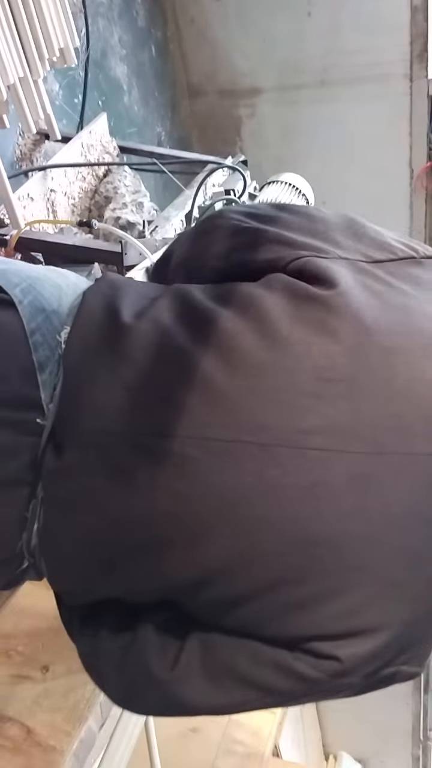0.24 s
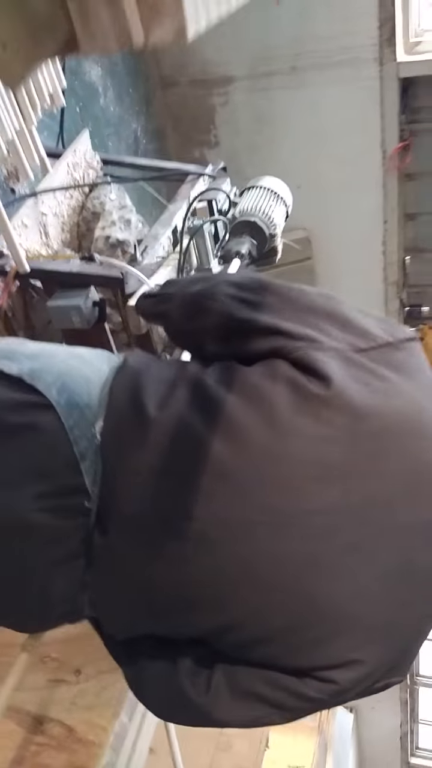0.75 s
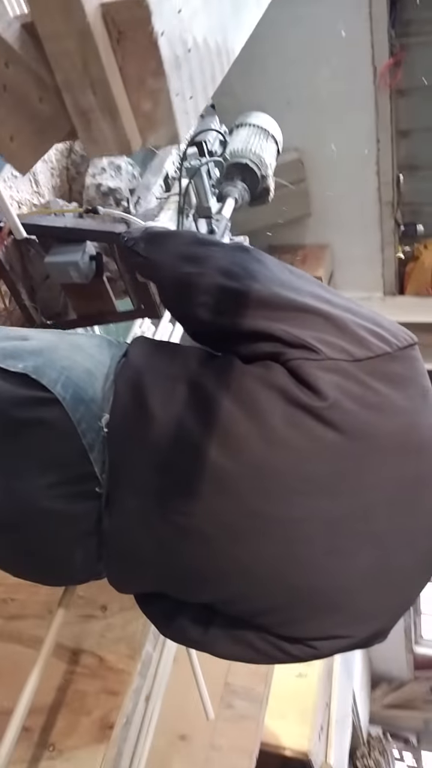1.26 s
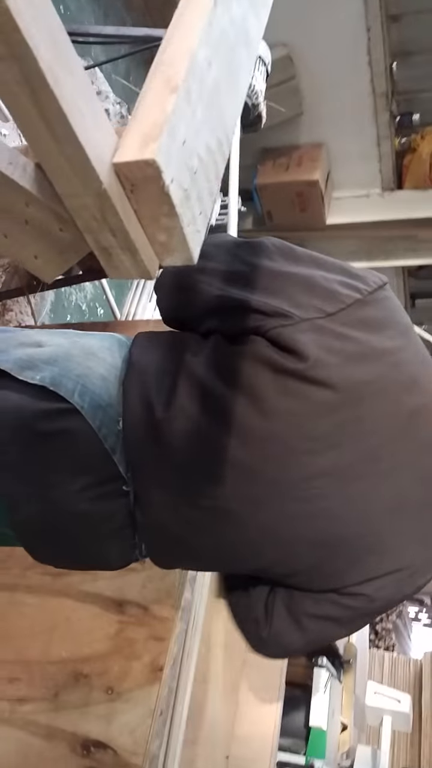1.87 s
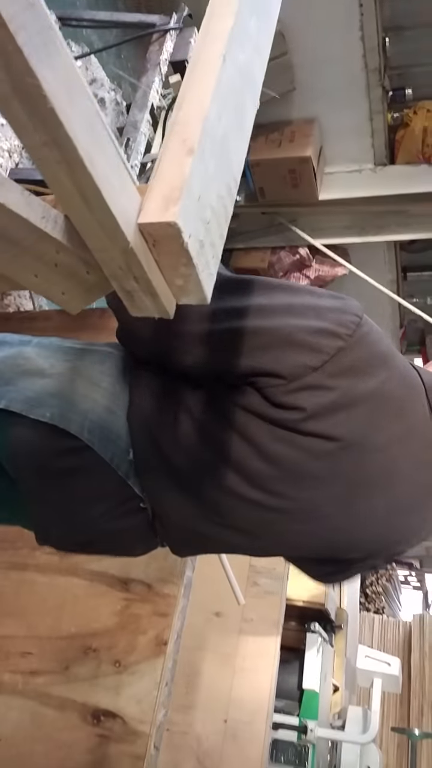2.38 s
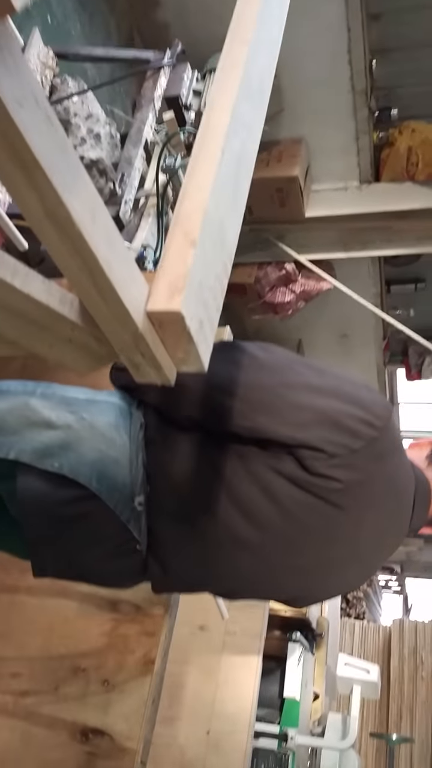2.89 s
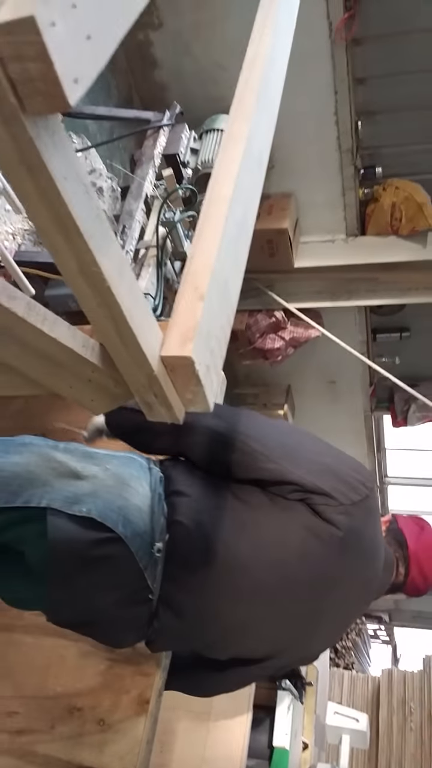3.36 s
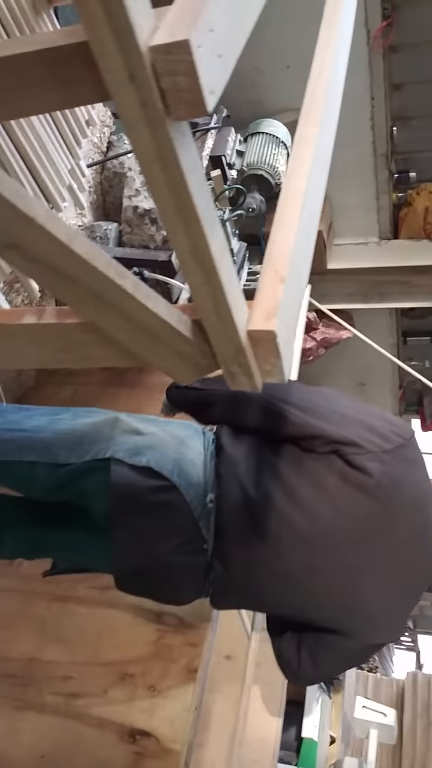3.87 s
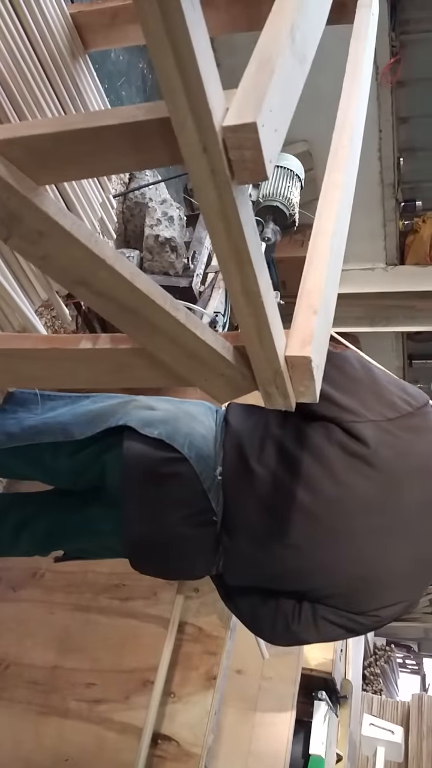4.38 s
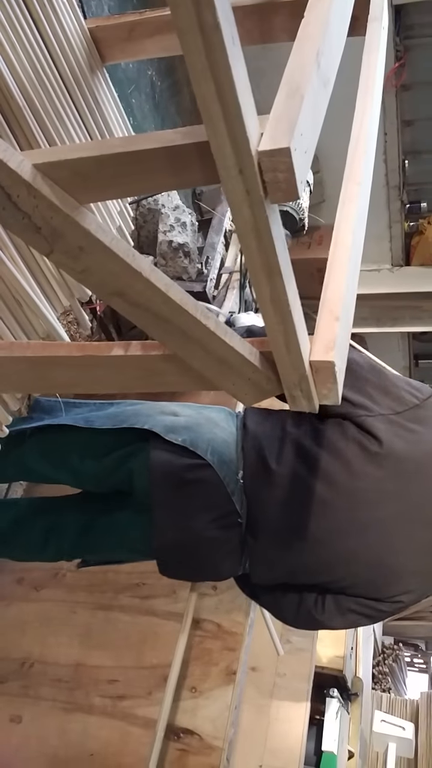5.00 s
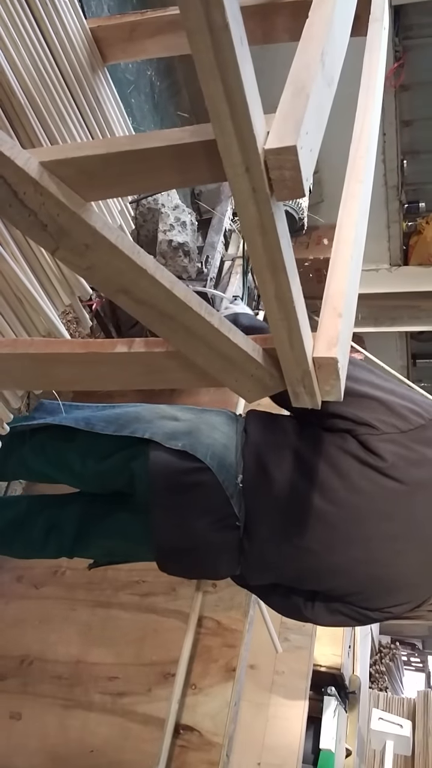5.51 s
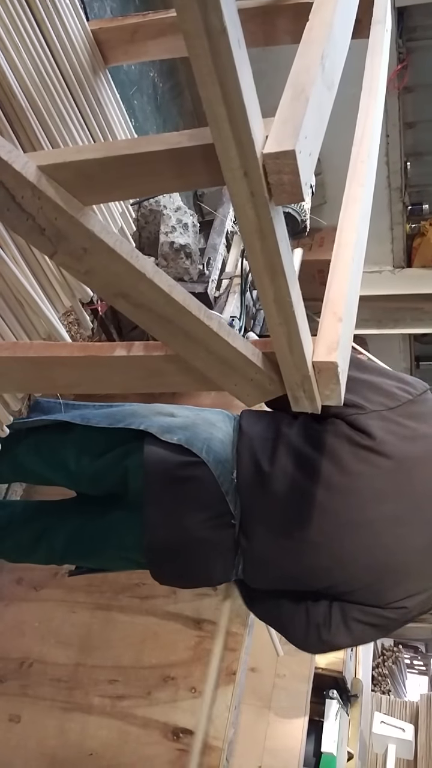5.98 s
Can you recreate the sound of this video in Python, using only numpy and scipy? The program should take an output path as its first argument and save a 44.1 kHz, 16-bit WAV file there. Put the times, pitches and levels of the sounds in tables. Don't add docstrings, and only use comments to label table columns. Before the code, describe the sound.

Continuous woodworking machine din, heard by someone walking past with a hand-held microphone: a mid-pitched, whirring chord from two spinning cutters and a hissing rush that changes colour with each step. An early soft puff and tick, then a hard burst of air and a quick run of bright ticks, a stick dropping with a short woody clatter, and later more brief puffs. Little deep bass; sharp peaks briefly duck the noise.

```python
import sys
import numpy as np
from scipy import signal
from scipy.fft import rfft, irfft
from scipy.io import wavfile
from scipy.ndimage import uniform_filter1d, map_coordinates

SR = 44100
rng = np.random.default_rng(int(sys.argv[2]) if len(sys.argv) > 2 else 0)


def wav_record(signal):
    frames = np.transpose(np.atleast_2d(signal))
    bounded = np.clip(frames, -1, 1)
    quanta = np.round(bounded * 32767).astype(np.int16)
    wavfile.write(sys.argv[1], SR, quanta)


def nominal_scale(level):
    x = np.asarray(level, float) / 20
    return 10 ** x


N = 275625
T = np.arange(N) / SR

KNIVES = 6
FRAMES, POINTS = 320, 2048
START_TURNS, GAIN_TURNS = (93.8, 95.27), (0.035, 0.023)

# (f/Hz, level/dB per Hz)
LEFT_RUSH = [(200, -64.5), (330, -64.5), (550, -67.5), (900, -68), (1400, -61.5), (1800, -59),
             (2600, -56.5), (3700, -62.5), (4600, -59), (7200, -56), (9000, -65.5), (11500, -69.5),
             (14000, -68.5), (15700, -72)]
RIGHT_RUSH = [(200, -61.5), (330, -61.5), (550, -61), (900, -63.5), (1400, -59.5), (1800, -55.5),
              (2600, -56), (3700, -59.5), (4600, -63), (7200, -66.5), (9000, -75), (11500, -72),
              (14000, -74.5), (15700, -64.5)]
# (f/Hz, likeness 0-1)
LIKENESS = [(200, 0.97), (550, 0.82), (900, 0.3), (1500, 0.59), (2600, 0.22), (3700, 0.13), (5000, 0),
            (9000, 0.44), (15000, 0)]
# (f/Hz, lead/rad)
LEFT_LEAD = [(0, 0), (430, 0.4), (1640, 4.0), (2500, 6.2), (2930, 6.5), (3620, 9.5), (4220, 9.8),
             (4570, 11.4), (7060, 17.9), (8010, 18.6), (11600, 27.6), (13700, 31.9), (15600, 37.5),
             (16500, 37.4)]
# (f/Hz, width/Hz, level/dB)
RUSH_HOLLOWS = [(3775, 210, -1.5), (4340, 150, -2.5), (3140, 140, -1.5)]
# (t/s, nearness/dB, open view to the chips/dB, turn to the left/dB)
WALK = [(0, 6, -7, -2), (.3, 5, -8.5, 1.5), (.7, -1, -2, -0.5), (1.1, -2.5, 4.5, 3), (1.5, -4, 10, -2),
        (1.9, -3.5, 10.5, -4), (2.3, -0.5, 0, -1.5), (2.7, -2, 5, -0.5), (3.0, 1, -0.5, 0.5),
        (3.3, -3, 7, 0), (3.6, -0.5, 4, -1.5), (4.1, -1.5, 7, -1), (4.6, -0.5, 5.5, -1), (5.1, 2, -2.5, 0),
        (5.5, 2, -0.5, -0.5), (5.9, 1.5, -2, 2.5), (6.25, 2, 1, -0.5)]
# (t/s, speed to near head/(m/s), speed to far head/(m/s))
APPROACH = [(0, 0, .3), (.45, .36, -.3), (.9, 0, .07), (1.25, 0, .05), (1.55, -.5, .15), (2.0, .55, .05),
            (2.5, .36, .15), (2.95, -.55, .25), (3.35, -.07, -.25), (3.75, .1, .2), (4.3, -.35, .1),
            (4.55, .1, -.35), (5.2, .1, .2), (5.55, .5, .3), (5.8, .1, .1), (6.25, .2, -.05)]
# (t/s, level/dB)
BODY_SCREEN = [(0, -6), (.4, -1), (.9, 0), (1.5, 0.5), (2.3, -1), (3.0, 0), (3.6, 1), (4.4, -1.5),
               (4.9, -5), (5.4, -3.5), (5.9, 0), (6.25, 0)]

# (start t/s, end t/s, f/Hz, width/Hz, level/dB, lean/dB)
WHISTLES = [
    (3.85, 4.7, 801, 3.7, -44, -2),
    (3.37, 3.66, 4880, 740, -24, 5),
    (1.26, 1.6, 4700, 930, -34, 9),
    (1.5, 1.68, 7500, 640, -29, 12),
    (1.6, 7, 7340, 430, -34.5, 12),
]
# (t/s, length/s, level/dB, lean/dB)
PUFFS = [
    (0.518, 0.035, -18.5, -2),
    (1.689, 0.013, -10, 3),
    (4.762, 0.008, -18, 3),
    (4.782, 0.012, -16.5, -1),
    (5.957, 0.014, -17, 1),
]
# (f/Hz, level/dB per Hz)
JET = [(3000, -24), (5000, -11), (8500, -7), (11000, -1), (14000, 0), (16000, -1)]
# (t/s, peak level/dB, f/Hz, 60 dB decay/s, lean/dB)
TICKS = [(0.11, -11, 2890, 0.046, -3), (0.643, -6, 2740, 0.018, -3), (1.471, -10, 4500, .012, 3),
         (2.908, -16, 2430, .03, -4), (2.912, -13, 3300, 0.027, 0), (1.792, -4, 7030, .008, 6),
         (1.834, -9, 7000, .008, -1), (1.951, -15, 6500, .008, 9), (1.961, -6, 6950, 0.0088, 6),
         (1.993, -4, 7600, 0.0097, 2), (2.037, -12, 4580, 0.018, -2), (2.916, -5.5, 2310, 0.022, -8),
         (2.918, -6, 3180, 0.02, 3), (2.917, -14, 4560, .012, 0), (2.916, -6.5, 5600, 0.026, -1),
         (2.948, -9, 3550, 0.025, 0), (3.802, -6, 2800, 0.009, 0), (5.098, -14, 6850, 0.01, 7)]
# (t/s, peak level/dB)
THUDS = [
    (2.954, -9),
    (2.964, -19),
    (2.9755, -12),
    (3.006, -17),
    (3.03, -22),
]
# (f/Hz, level/dB, twice the 60 dB decay/s)
PILE_TONES = [(140, 1, 0.3), (183, 6, 0.18), (255, 3, 0.14), (330, -6, 0.2), (440, -2, 0.08),
              (650, -6, 0.09), (820, -4, .08)]

# (order, level/dB above 1 Hz of rush)
NEAR_ORDERS = [(2, -10), (3, 14), (4, 14), (5, 8), (7, -3), (9, 22), (11, 22), (15, 18.5), (17, 23.5),
               (21, 19.5), (22, 20), (27, 15), (28, 17)]
FAR_ORDERS = [(2, 4.4), (3, 2.8), (5, 18.8), (8, 9.3), (10, 24), (11, 22), (13, 19.3), (15, 25), (16, 13),
              (21, 3.5), (22, 3.7), (25, 3.3), (26, 5.6), (27, 12.5), (28, 2.6), (29, 3.3)]
# (order, t/s, length/s, right
# level/dB, lean/dB)
NEAR_SPOTS = [(6, 0.25, 0.7, -29.5, -7.5), (6, 0.71, 1.4, -31.5, -5), (6, 2.495, 0.51, -24, -17),
              (6, 2.94, 0.43, -24, -8), (6, 3.22, 1.1, -31.5, -3), (6, 4.25, 0.31, -32.5, -12),
              (6, 6.1, 2.4, -32, -23), (12, 0.13, 0.92, -23, -8), (12, 1.26, 0.48, -27.5, -20),
              (12, 1.81, 0.23, -28.5, -26), (12, 2.44, 2.2, -35, 8), (12, 4.43, 0.71, -27.5, -25),
              (12, 5.06, 0.72, -24.5, -23), (12, 5.66, 0.78, -21.5, -15), (12, 6.16, 0.25, -24, -26),
              (18, 0.34, 0.19, -22.5, 1.5), (18, 0.74, 0.3, -19.5, -4.5), (18, 1.16, 0.4, -18, -11),
              (18, 1.93, 0.42, -28, -17), (18, 2.48, 0.26, -23, -15), (18, 3.86, 0.54, -20, -5.5),
              (18, 5.9, 0.27, -22.5, -15), (18, 6.36, 2.9, -20.5, -17), (18, 9, 0.15, -20.5, -10),
              (24, 0.81, 0.14, -30, -25), (24, 1.115, 0.2, -22, -21), (24, 1.37, 0.12, -24, -2),
              (24, 1.57, 0.17, -31, -6), (24, 4, 0.21, -31, -6), (24, 5.19, 0.19, -33, -12),
              (30, 0.37, 0.26, -27.5, -8), (30, 1.38, 0.39, -29, -14), (30, 1.93, 0.22, -31, -27),
              (30, 2.87, 0.27, -24.5, -14), (30, 4.01, 0.12, -30.5, -8), (30, 4.9, 0.51, -32, -3.5),
              (30, 5.57, 0.41, -30.5, -25), (30, 6.17, 0.15, -32, -2),
              (10, 0.87, 0.16, -42, 0), (10, 1.5, 0.57, -38, -25), (10, 4.63, 0.17, -38, 4),
                   (10, 5.4, 1.3, -42.5, 8), (13, 2, 0.91, -38, -5), (13, 3.22, 0.34, -41, -1),
                   (13, 5.3, 3.1, -31.5, -7), (14, 0.33, 0.24, -35, 1), (14, 0.81, 0.36, -32, 1.5),
                   (14, 2.15, 1.3, -32.5, -9), (14, 3.22, 0.26, -30.5, -12), (14, 5.08, 0.5, -33, -17),
                   (16, 0.58, 0.34, -31.5, -7), (16, 2.4, 0.19, -33, -9), (16, 5.8, 7, -31.5, -4),
                   (19, 0.39, 0.28, -43, -3), (19, 1.12, 0.2, -26, -14), (19, 2.55, 0.26, -31, 2),
                   (19, 3.9, 0.52, -33, -12), (20, 0.39, 0.27, -41.5, 10.5), (20, 0.69, 0.34, -28.5, -6),
                   (20, 1.13, 0.48, -30.5, 1.5), (20, 3.96, 0.17, -29, -2), (20, 4.3, 0.36, -32, -8),
                   (23, 1.2, 0.84, -29.5, -14), (23, 3.2, 0.22, -32, -18), (23, 3.1, 2.5, -30, -10),
                   (26, 0.85, 0.96, -34, -2), (26, 2.49, 0.34, -35.5, 1), (26, 3.4, 0.27, -32, -4),
                   (26, 3.74, 0.22, -45, -6), (29, 0.39, 0.28, -30, -2), (29, 1.19, 0.27, -44, -3),
                   (29, 2.3, 0.15, -33, -10), (36, 1.15, 0.36, -28.5, -17), (36, 2.8, 0.17, -36, -4),
                   (36, 3.49, 0.15, -27.5, -10), (25, .2, .5, -31.5, -7),
              (8, 0.3, 0.99, -33.5, -6), (8, 2.56, 0.7, -42, -4)]
FAR_SPOTS = [(6, 0.08, 0.16, -36, -19), (6, 0.45, 0.53, -42, -25.0), (6, 2.9, 0.16, -40, -12.0),
             (6, 6, 0.28, -37, -20), (12, 0.41, 0.39, -28.5, 0), (12, 1.27, 0.36, -29, -25.0),
             (12, 2.2, 0.72, -27, -12), (12, 3.02, 0.48, -25, -22.0), (12, 3.46, 0.32, -26.5, -25.0),
             (12, 5.5, 3.4, -26, -5), (12, 4.52, 0.13, -25, -8), (12, 6.7, 0.42, -30.0, -3),
             (18, 1.37, 0.29, -25, -7), (18, 1, 0.36, -44, -17.0), (18, 3.28, 0.31, -27.5, -15),
             (18, 3, 0.2, -29, -10), (18, 3.8, 0.94, -24, -15), (18, 5.77, 0.32, -26, 2),
             (18, 5, 0.44, -32, -4.0), (18, 5.3, 0.28, -26, -1), (18, 4.6, 0.3, -27, -8),
             (18, 6.2, 0.25, -25, -4.0), (24, 0.11, 0.28, -26.5, -7), (24, 0.46, 0.15, -33, -9.0),
             (24, 1.5, 0.18, -33, -9.0), (24, 2.03, 0.41, -37.5, 3.5), (24, 5.7, 0.59, -39, -6),
             (24, 7.5, 0.2, -38, -5), (30, 0.01, 0.21, -29.0, -2), (30, 0.37, 0.15, -32, -4),
             (30, 5.8, 0.32, -42.0, 3.0), (14, 1.17, 0.15, -41.0, -12.0), (14, 1, 1.05, -47, -16.0),
             (14, 3.9, 0.18, -42.0, -25.0), (20, 0.54, 0.15, -40, -5), (20, 0.91, 0.34, -33.0, -6.0),
             (20, 1.3, 0.29, -33, -8.0), (20, 4.31, 0.66, -42, -9.0),
             (17, 0.33, 0.15, -35, 1), (17, 1.45, 0.28, -39, 1), (17, 2.76, 0.64, -30, -11),
                  (17, 4, 0.55, -29.5, -16), (17, 4.75, 0.24, -36, -8), (17, 5.24, 0.58, -28.5, -15),
                  (19, 2.7, 1.59, -32, -25), (19, 3.7, 0.33, -29, -24), (19, 4.45, 0.53, -29, -1),
                  (19, 4.97, 0.23, -33, -13), (19, 5.8, 0.57, -33, -2), (23, 1.08, 0.25, -37, -25),
                  (23, 2.4, 2.1, -38, -19), (23, 2.22, 0.26, -31, -8), (23, 3.05, 0.16, -37, -4),
                  (23, 3.36, 0.15, -38, 0),
             (4, 5.4, 3.7, -44.5, -5.5), (7, 1.3, 2.3, -46, -4), (9, 1.3, 1.8, -44, -9)]
# (order, right level/dB, lean/dB)
NEAR_REST = [(6, -37.5, -15), (12, -55, 4), (18, -46, -4), (24, -36, -4), (30, -37.5, -3.5),
             (10, -44, -1), (13, -55, 13), (14, -35, -30), (16, -36, -7), (19, -42.5, -2),
                  (20, -38.5, -3), (23, -46, -2), (26, -44.5, 6), (29, -42, -3), (36, -38, 2),
                  (25, -43.5, -3),
             (8, -53.5, 1)]
FAR_REST = [(6, -42, -5.5), (12, -38.5, -25), (18, -33, -0.5), (24, -43.5, 0), (30, -53, -8), (14, -49, 6),
            (20, -46, -6),
            (17, -45, -2), (19, -53, 1), (23, -47, -1),
            (4, -59, -6), (7, -53, 2), (9, -58, -4)]

# (t/s, dip level/dB, onset/s, recovery/s)
DIPS = [
    (.518, -4.5, 0.049, 0.042),
    (1.689, -9, 0.015, 0.073),
    (1.92, -3, 0.0069, 0.047),
    (1.994, -4.5, .005, 0.034),
    (2.919, -3.5, .005, 0.033),
    (2.957, -2.5, 0.0041, 0.054),
    (4.775, -0.5, 0.018, 0.034),
    (5.958, -4.5, 0.014, 0.063),
]
# (f/Hz, extra sink/dB for each dB below the surroundings)
SUPPRESS = [(900, 0), (1400, 3), (2200, 2), (3000, 4.5), (4300, 8), (5200, 2.5), (7500, 1.5), (9500, 8),
            (15000, 8)]
# (f/Hz, level/dB)
BASS_CUT = [(20, -50), (60, -46), (100, -40), (130, -24), (150, -16.5), (176, -12.5), (190, 0)]


def in_time(rows, s):
    rows = np.array(rows)
    return np.array([np.interp(s, rows[:, 0], column) for column in rows.T[1:]])


def at_hz(points, hz):
    points = np.array(points)
    return np.interp(np.log(hz + 1), np.log(points[:, 0] + 1), points[:, 1])


def lean(db):
    return nominal_scale(db * np.array([[0.5], [-0.5]]))


def drift(rate):
    knots = rng.standard_normal(400)
    return map_coordinates(knots, [T * np.clip(rate, 0.1, 60)], order=1) * 1.22


def port_pair(hz, shape):
    shared, left, right = rng.standard_normal((3, *shape, 2)) @ [1, 1j] / np.sqrt(2)
    alike = np.clip(at_hz(LIKENESS, hz), 0, 1)
    lead = np.exp(1j * np.interp(hz, *np.transpose(LEFT_LEAD)))
    leads = np.array([lead, np.ones_like(lead)]).reshape(2, *[1] * (len(shape) - 1), -1)
    return np.sqrt(alike) * shared * leads + np.sqrt(1 - alike) * np.array([left, right])


def turns(which):
    t = T + np.cumsum(in_time(APPROACH, T)[which]) / SR / 343
    return START_TURNS[which] * t + GAIN_TURNS[which] * t ** 2 / 2


def rush(hump_db, patchy_db, knife_beat, turn_beat):
    view_hz, screen_hz = 6340, 2130
    low_turn, bass_share = 1, 0.046
    shade_db = 2
    hz = np.fft.rfftfreq(N, 1 / SR)
    angle = turns(0)
    knife_hz = KNIVES * angle[-1] * SR / N
    humps_db = hump_db * np.cos(2 * np.pi * hz / knife_hz)
    for at, width_hz, db in RUSH_HOLLOWS:
        humps_db = humps_db + db * np.exp(-((hz - at) / width_hz) ** 2)
    colour = nominal_scale(np.array([at_hz(LEFT_RUSH, hz), at_hz(RIGHT_RUSH, hz)]) + humps_db)
    noise = colour * port_pair(hz, hz.shape) * np.sqrt(N * SR / 2)
    turn_pulse = np.cos(2 * np.pi * angle) + np.cos(4 * np.pi * angle)
    beat = knife_beat * np.cos(2 * np.pi * KNIVES * angle) + turn_beat * turn_pulse

    near_db, view_db, turn_db = in_time(WALK, T)
    screen_db = in_time(BODY_SCREEN, T)[0]
    together = drift(14)
    centres = np.geomspace(225, 14400, 13)
    place = np.interp(np.log(hz + 1), np.log(centres), np.arange(13))
    out = 0
    for k, centre in enumerate(centres):
        treble = np.clip(np.log2(centre / 1500) / 2, 0, 1)
        near_share = bass_share + (1 - bass_share) * np.clip(np.log2(centre / 300) / 2, 0, 1)
        db = near_db * near_share
        db = db + view_db / (1 + (view_hz / centre) ** 2)
        db = db + screen_db * np.exp(-2 * np.log2(centre / screen_hz) ** 2)
        db = db + shade_db * drift(3.025)
        db = db + patchy_db * treble * (0.18 * together + drift(20))
        lean_db = (low_turn + (1 - low_turn) * treble) * turn_db
        band = irfft(noise * np.clip(1 - abs(place - k), 0, 1), N)
        out = out + band * nominal_scale(db) * lean(lean_db) * (1 + treble * beat)
    return out


def whistles():
    out = np.zeros((2, N))
    for start, end, hz, width_hz, db, lean_db in WHISTLES:
        edges = [hz - width_hz / 2, hz + width_hz / 2]
        narrow = signal.butter(2, edges, "band", fs=SR, output="sos")
        band = signal.sosfilt(narrow, rng.standard_normal((2, N)))
        gate = np.clip(np.minimum(T - start, end - T) / 0.11, 0, 1)
        out += band / band.std() * gate * nominal_scale(db) * lean(lean_db)
    return out


def valves():
    hz = np.fft.rfftfreq(N, 1 / SR)
    jet = irfft(nominal_scale(at_hz(JET, hz)) * port_pair(hz, hz.shape), N)
    gate = np.zeros((2, N))
    for s, length, db, lean_db in PUFFS:
        rise = np.clip((T - s) / 0.0027, 0, 1)
        fall = np.exp(-np.maximum(T - s - length, 0) / 0.021)
        gate += rise * fall * nominal_scale(db) * lean(lean_db)
    return jet / jet.std() * gate


def ring(s, db, hz, t60):
    t = np.maximum(T - s, 0)
    return nominal_scale(db - 3 - 60 * t / t60) * np.minimum(20 * t / t60, 1) * np.sin(2 * np.pi * hz * t)


def stick_ticks():
    rough = 1 + 0.7 * uniform_filter1d(rng.standard_normal((2, N)), size=5)
    out = np.zeros((2, N))
    for s, db, hz, t60, lean_db in TICKS:
        out += ring(s, db, hz, t60) * rough * lean(lean_db)
    return out


def stick_lands():
    low_band = signal.butter(4, [130, 850], "band", fs=SR, output="sos")
    rumble = signal.sosfilt(low_band, rng.standard_normal(N))
    out = np.zeros(N)
    for s, db in THUDS:
        for hz, tone_db, t60 in PILE_TONES:
            out += ring(s, db + tone_db - 7 + rng.normal(0, 2.0), hz, t60 / 2)
        out += ring(s, db + 6, 320, 0.033) + ring(s, db, 620, 0.022)
        out += rumble * (T > s) * nominal_scale(db + 1 - 60 * np.maximum(T - s, 0) / 0.15)
    return out * nominal_scale(np.array([[-3.5], [2.5]]))


def standing(spots, rest):
    s = np.linspace(0, N / SR, FRAMES)
    power = {k: nominal_scale([[db + lean_db], [db]]) ** 2 + 0 * s for k, db, lean_db in rest}
    for k, middle, length, db, lean_db in spots:
        bell = np.exp(-(2 * (s - middle) / length) ** 2)
        power[k] = power[k] + nominal_scale([[db + lean_db], [db]]) ** 2 * bell
    return power


def head(which, spots, rest, low_orders, turn_db, knife_db, fade_db, width_hz):
    order = np.arange(1, 170)
    angle = turns(which)
    hz = order * angle[-1] * SR / N
    over_db = np.where(order % KNIVES == 0, knife_db - fade_db * np.log2(order / 36), turn_db)
    for k, db in low_orders:
        over_db[k - 1] = db
    size = nominal_scale(over_db + np.array([at_hz(LEFT_RUSH, hz), at_hz(RIGHT_RUSH, hz)]))[:, None]

    sway = port_pair(hz, (FRAMES, len(order)))
    keep = np.exp(-np.pi * width_hz * np.sqrt(order / 18) * N / SR / FRAMES)
    for i in range(1, FRAMES):
        sway[:, i] = keep * sway[:, i - 1] + np.sqrt(1 - keep ** 2) * sway[:, i]
    lead = np.interp(hz, *np.transpose(LEFT_LEAD)) * np.array([[1], [0]])
    steady = np.exp(1j * (rng.uniform(0, 2 * np.pi, len(order)) + lead))
    lines = size * (0.5 * steady[:, None] + 0.65 * sway)
    for k, power in standing(spots, rest).items():
        lines[:, :, k - 1] = np.sqrt(power) * (steady[:, None, k - 1] + 0.25 * sway[:, :, k - 1])

    with_zero_order = np.pad(lines, ((0, 0), (0, 0), (1, 0)))
    waves = irfft(with_zero_order, POINTS) * POINTS / np.sqrt(2)
    where = [T * SR / N * (FRAMES - 1), angle % 1 * POINTS]
    return np.array([map_coordinates(w, where, order=1, mode="grid-wrap") for w in waves])


def near_head():
    spots = NEAR_SPOTS
    rest = NEAR_REST
    return head(0, spots, rest, NEAR_ORDERS + [(78, 7.2)],
                turn_db=16.0, knife_db=25.0, fade_db=2.5, width_hz=1.97)


def far_head():
    spots = FAR_SPOTS
    rest = FAR_REST
    return head(1, spots, rest, FAR_ORDERS, turn_db=11.5, knife_db=17.0, fade_db=23.0, width_hz=1.35)


def scene():
    air = rush(hump_db=-1.0, patchy_db=1.15, knife_beat=0.055, turn_beat=0.064)
    events = whistles() + valves() + stick_ticks() + stick_lands()
    return air + events + far_head() + near_head()


def limit(x):
    gain_db = 0
    for s, db, onset, recovery in DIPS:
        fall = np.clip((T - s) / onset, 0, 1)
        gain_db = gain_db + db * fall * np.exp(-(np.maximum(T - s - onset, 0) / recovery) ** 1.8)
    return 0.98 * np.tanh(x * nominal_scale(gain_db) / 0.93)


def suppress(x, margin_db):
    hz, _, z = signal.stft(x, SR, nperseg=2048)
    power = (abs(z) ** 2).mean(axis=0) + 1e-18
    patch = uniform_filter1d(uniform_filter1d(power, size=8, axis=0), size=3, axis=1)
    around = uniform_filter1d(np.log10(patch), size=41, axis=0)
    doubt = rng.standard_normal(power.shape)
    doubt = uniform_filter1d(uniform_filter1d(doubt, size=16, axis=0), size=2, axis=1)
    under_db = 10 * (np.log10(patch) - around) + 1.1 * doubt / doubt.std()
    strength = np.clip(at_hz(SUPPRESS, hz), 0, 8)[:, None]
    sink_db = strength * np.clip(under_db + margin_db, -6, 0.4)
    return signal.istft(z * nominal_scale(sink_db), SR, nperseg=2048)[1][:, :N]


def cut_bass(x):
    hz = np.fft.rfftfreq(2 * N, 1 / SR)
    return irfft(rfft(x, 2 * N) * nominal_scale(at_hz(BASS_CUT, hz)), 2 * N)[:, :N]


def top_cut(x):
    return signal.sosfilt(signal.butter(12, 15830, fs=SR, output="sos"), x)


def record(dry):
    x = suppress(limit(dry), margin_db=0.5)
    x = signal.sosfilt(signal.ellip(12, 0.5, 90, 15740, fs=SR, output="sos"), x)
    mix = cut_bass(x * np.clip(T / 0.00091, 0, 1))
    return top_cut(mix)


dry = scene()
out = record(dry)
wav_record(out)
```